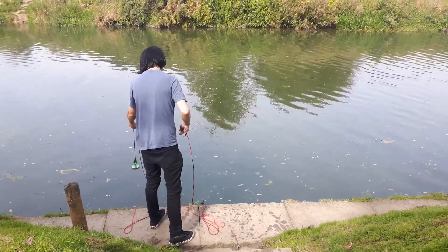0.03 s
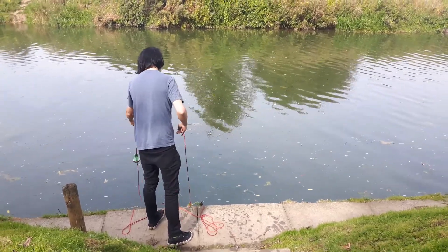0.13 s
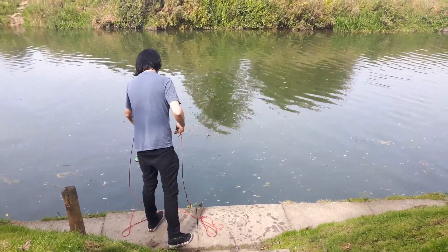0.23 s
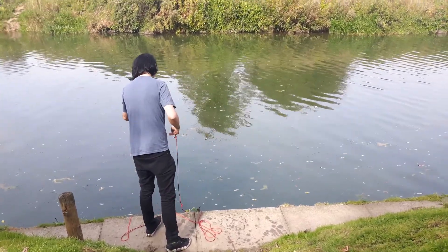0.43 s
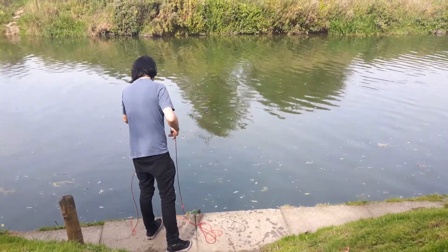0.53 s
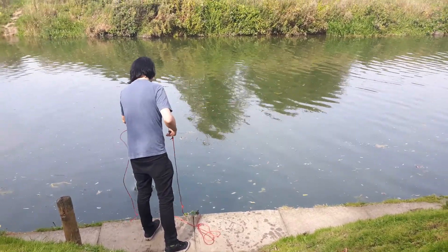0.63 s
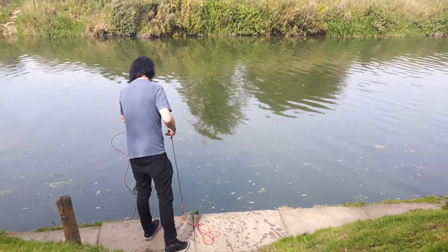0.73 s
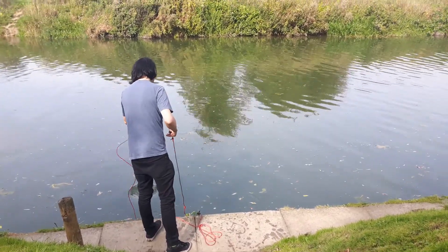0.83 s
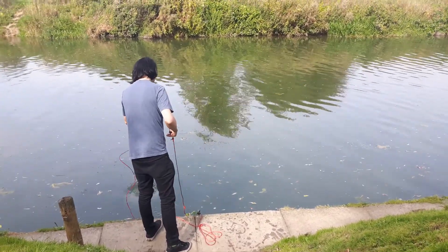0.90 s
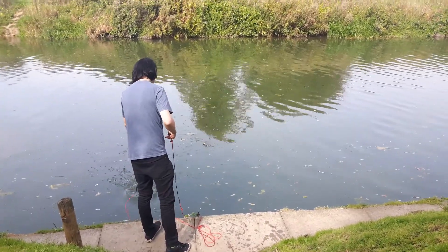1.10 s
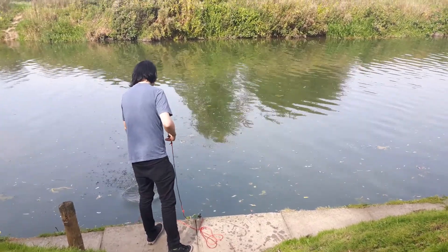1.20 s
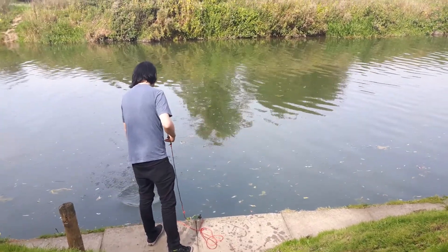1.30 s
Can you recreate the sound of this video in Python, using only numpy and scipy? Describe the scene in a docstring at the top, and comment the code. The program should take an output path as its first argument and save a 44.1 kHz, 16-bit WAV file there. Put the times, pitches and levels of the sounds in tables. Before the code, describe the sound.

One short, deep plop sounds as a roped magnet hits the river beside a concrete bank. Soft knocks and rope ticks come before it, light drips and a small gulp after, over outdoor rumble and a distant engine drone.

```python
"""On a concrete river bank, a low outdoor rumble and the drone of a far engine lie under everything.
Soft knocks and rope ticks come first. Then a heavy magnet on a rope drops into the river: it slaps the
surface, the air pocket behind it gives a low plop, and small bubbles ring. Thrown drops patter back
with a fizz of fine spray, and a large bubble comes up with a gulp. The concrete adds a quick echo."""
import sys
import numpy as np
from scipy import signal
from scipy.fft import rfft, irfft
from scipy.io import wavfile

SR = 44100
rng = np.random.default_rng(int(sys.argv[2]) if len(sys.argv) > 2 else 0)


def dump(signal):
    """Clip the signal to [-1, 1] and save it as 16-bit WAV at the path in sys.argv[1]."""
    limited = np.clip(np.atleast_2d(signal).T, -1, 1)
    pcm = np.round(limited * 32767).astype(np.int16)
    wavfile.write(sys.argv[1], SR, pcm)


N = 59535
ENTRY_S = 0.7676  # the magnet hits the water

# tone of the outdoor rumble and hiss: f/Hz, relative level/dB
AIR_SPECTRUM = [(20, -49), (55, -9), (90, 3), (150, -1.5), (200, -4), (255, -4), (330, -16), (440, -9.5),
                (600, -16.5), (880, -16), (1100, -21.5), (2000, -32), (4000, -43), (6500, -48.5),
                (9300, -46), (11500, -49.5), (15000, -46.5)]
# slow swells of the rumble: t/s, level/dB
RUMBLE_LEVELS = [(0, -43), (.12, -43.5), (.2, -41.5), (.28, -44), (.47, -43), (.62, -43), (.85, -45),
                 (1.02, -43.7), (1.18, -45.5), (1.35, -43.5)]
# the far engine's low note swells and fades: t/s, level/dB
DRONE_LEVELS = [(0, -62), (.35, -55), (.6, -52), (1.15, -53.5), (1.35, -68)]
# soft knocks on the bank: t/s, level/dB
KNOCK_HITS = [(.011, -34), (0.412, -30.5)]
# the notes in one knock: f/Hz, relative level/dB, time to fade by 60 dB/s
KNOCK_NOTES = [(356, -10, 0.033), (476, 6.5, 0.015), (668, 1, .013), (1220, -10, 0.017)]
# fine ticks of rope and spray: t/s, level/dB, treble cutoff f/Hz
TICK_HITS = [(.6203, -48.5, 12000), (0.629, -60, 12000), (0.646, -50.5, 19000), (0.759, -54, 11000),
             (.7750, -50, 15000), (0.777, -55, 15000), (.8105, -55, 16100), (1.2362, -45.5, 10000)]
# tone of a tick: f/Hz, relative level/dB
TICK_SPECTRUM = [(1000, -11), (2500, -0.5), (4500, -7.5), (7000, -4), (11500, -5), (15000, -1.5)]
# tone of the fine spray coming down: f/Hz, relative level/dB
FIZZ_SPECTRUM = [(800, -4), (2000, 8.5), (3100, -7), (4500, -16), (7500, -18), (9300, -6.5), (12000, -29)]
# showers of small drops: middle t/s, spread in time/s, typical drop's level/dB, typical f/Hz
DROP_SHOWERS = [(.812, .02, -58, 1514), (0.913, .035, -63, 1790), (1.27, .05, -54, 1675)]
# single bubbles and drops: t/s, starting f/Hz, level/dB, cycles to fade by 60 dB
CLEAR_BUBBLES = [(0.786, 1965, -38, 27), (0.792, 1270, -35.5, 12), (.7945, 2040, -48, 52),
                 (.7990, 1150, -36.5, 45), (0.81, 1350, -40, 21), (0.8118, 1030, -39, 15),
                 (0.8404, 1490, -36.5, 13.4), (1.1802, 1220, -35.5, 9.4), (1.2555, 456, -39, 22),
                 (1.283, 880, -41, 10), (1.3040, 1900, -43, 21), (1.3270, 2720, -49, 26)]
# tone of the spray torn off by the magnet: f/Hz, relative level/dB
SPRAY_SPECTRUM = [(300, -7.5), (1400, 0.5), (2500, -15), (4000, -20), (8000, -17), (11500, -25.5),
                  (15000, -20)]
# the short notes in the slap: f/Hz, level/dB, time to fade by 60 dB/s
SLAP_NOTES = [(205, -29.5, 0.029), (448, -29, 0.035), (640, -27, 0.0041), (894, -39, 0.011),
              (1300, -34.5, 0.013), (1845, -42, 0.022), (2190, -40, .016), (2950, -44.5, 0.022)]


def undb(db):
    """Turn decibels into a number to multiply by."""
    return 10 ** (np.asarray(db) / 20)


def since(start):
    """Seconds since a moment, zero before it."""
    return np.maximum(np.arange(N) / SR - start, 0)


def burst(t, attack_s, fade_s):
    """A quick rise, and a fade that loses 60 dB every fade_s seconds."""
    return (1 - np.exp(-t / attack_s)) * np.exp(-np.log(1000) * t / fade_s)


def noise(spectrum):
    """Noise of level one, with its tone shaped by (f/Hz, level/dB) points."""
    hz, db = np.array(spectrum).T
    freqs = np.maximum(np.fft.rfftfreq(N, 1 / SR), 1)
    gains = undb(np.interp(np.log(freqs), np.log(hz), db))
    shaped = irfft(rfft(rng.standard_normal(N)) * gains, N)
    return shaped / shaped.std()


def wander(rate_hz):
    """A smooth random drift around zero, typically one unit wide."""
    keep_slow = np.exp(-(np.fft.rfftfreq(N, 1 / SR) / rate_hz) ** 2)
    drift = irfft(rfft(rng.standard_normal(N)) * keep_slow, N)
    return (drift - drift.mean()) / drift.std()


def level_curve(points):
    """Join (t/s, level/dB) points into a volume curve."""
    return undb(np.interp(since(0), *np.array(points).T))


def lowpass(sound, hz):
    """Turn down the treble above hz without delaying the sound."""
    return signal.sosfiltfilt(signal.butter(2, min(hz, .45 * SR), fs=SR, output="sos"), sound)


def ring(start, notes, attack_s):
    """A hit sets off several fading notes at once."""
    t = since(start)
    return sum(undb(db) * burst(t, attack_s, fade_s) * np.sin(2 * np.pi * hz * t)
               for hz, db, fade_s in notes)


def outdoor_air(split_hz=2780, flicker_db=1.25):
    """A restless low rumble with a faint, even hiss above it."""
    air = noise(AIR_SPECTRUM)
    low = lowpass(air, split_hz)
    rumble = low * level_curve(RUMBLE_LEVELS) * undb(flicker_db * wander(rate_hz=18))
    hiss = undb(-43.5) * (air - low)
    return rumble + hiss


def far_engine(hz=47.95):
    """A far engine drones on a slightly wavering low note and the octave above it."""
    pitch = hz * (1 + .02 * wander(rate_hz=5))
    phase = 2 * np.pi * np.cumsum(pitch) / SR
    return level_curve(DRONE_LEVELS) * np.sqrt(2) * (np.sin(phase) + undb(-2) * np.sin(2 * phase))


def knocks():
    """Dull knocks, like a shoe on the concrete slabs."""
    return sum(undb(db) * ring(start, KNOCK_NOTES, attack_s=0.00075) for start, db in KNOCK_HITS)


def ticks():
    """Bright little ticks as the rope runs out and spray lands."""
    grit = noise(TICK_SPECTRUM)
    return sum(undb(db) * burst(since(start), attack_s=0.00079, fade_s=0.021) * lowpass(grit, top_hz)
               for start, db, top_hz in TICK_HITS)


def fizz(middle_s=1.258, spread_s=0.081):
    """The finest spray settles on the river with a soft hiss."""
    swell = np.exp(-.5 * ((since(0) - middle_s) / spread_s) ** 2)
    return undb(-61) * swell * noise(FIZZ_SPECTRUM)


def bubble(t, hz, cycles, rise=0.18):
    """Trapped air rings, and its pitch rises as it nears the surface."""
    life_s = cycles / hz
    pitch = hz * (1 + rise * np.minimum(t / life_s, 1))
    phase = 2 * np.pi * np.cumsum(pitch * (t > 0)) / SR
    return burst(t, attack_s=0.54 / hz, fade_s=life_s) * np.sin(phase)


def shower(middle_s, spread_s, db, hz, count=170, spread_octaves=0.884, scatter_db=5.5):
    """Small drops land at random, each making a tick and a tiny bubble."""
    size = 2048  # samples in one drop
    patter, t = np.zeros(N + size), np.arange(size) / SR
    for when, pitch, strength in rng.standard_normal((count, 3)):
        tick = undb(-14) * rng.standard_normal(size) * np.exp(-t / 0.0012)
        drop_hz = hz * 2 ** (spread_octaves * np.tanh(pitch))
        drop = tick + bubble(t, drop_hz, cycles=13.3)
        landing_s = max(middle_s + spread_s * when, ENTRY_S)  # never before the splash
        first = int(np.clip(landing_s * SR, 0, N))
        patter[first:first + size] += undb(db + scatter_db * min(strength, 2)) * drop
    return lowpass(patter[:N], hz=3600)


def bubbles():
    """A few small bubbles ring out clearly, and a large one comes up with a gulp."""
    small = sum(undb(db) * bubble(since(start), hz, cycles) for start, hz, db, cycles in CLEAR_BUBBLES)
    gulp = undb(-39.5) * bubble(since(1.312), hz=261.4, cycles=120)
    return small + gulp


def slap():
    """The magnet smacks the surface, throwing a short spray and a longer, fainter mist."""
    t = since(ENTRY_S)
    spray = undb(-33) * burst(t, attack_s=0.0029, fade_s=0.02)
    mist = undb(-53.5) * burst(t, attack_s=0.0029, fade_s=0.36)
    return ring(ENTRY_S, SLAP_NOTES, attack_s=.0003) + (spray + mist) * noise(SPRAY_SPECTRUM)


def plop(low_hz=86.8, extra_hz=162, sink_s=0.0041):
    """The air pocket behind the magnet booms, and its note sinks quickly as the pocket deepens."""
    t = since(ENTRY_S)
    cycles = low_hz * t + extra_hz * sink_s * (1 - np.exp(-t / sink_s))  # starts extra_hz above low_hz
    return undb(-16.5) * burst(t, attack_s=0.00024, fade_s=0.12) * np.sin(2 * np.pi * cycles)


def scene(echo_delay_s=.0022, echo_db=-11.5):
    """The splash and its quick echo off the concrete, among the sounds of the bank."""
    splash = slap() + bubbles() + fizz() + sum(shower(*row) for row in DROP_SHOWERS)
    echo = undb(echo_db) * np.interp(since(echo_delay_s), since(0), splash)
    bank = knocks() + ticks() + outdoor_air() + far_engine()
    return (bank + splash + echo + plop())[None]


def record(dry, low_cut_hz=27, top_hz=15700):
    """The microphone thins the deepest bass, then the highest treble is cut off."""
    thinned = signal.sosfilt(signal.butter(1, low_cut_hz, "high", fs=SR, output="sos"), dry)
    return signal.sosfilt(signal.ellip(10, .2, 70, top_hz, fs=SR, output="sos"), thinned)


dry = scene()
out = record(dry)
dump(out)
```